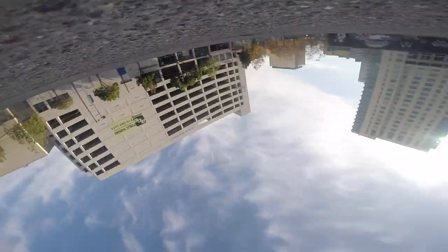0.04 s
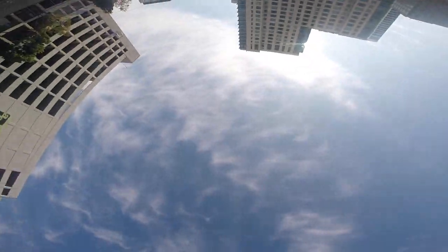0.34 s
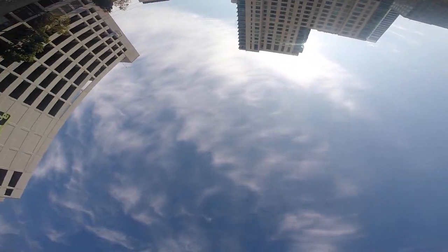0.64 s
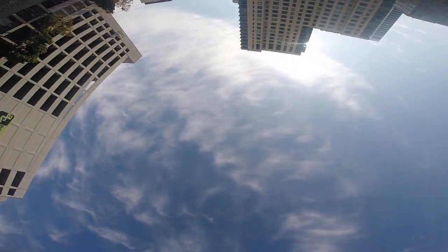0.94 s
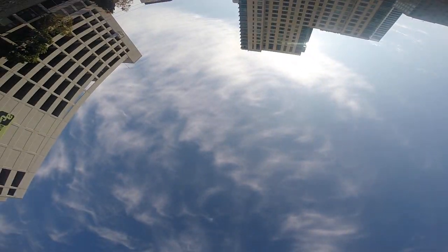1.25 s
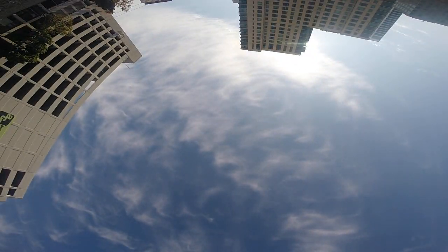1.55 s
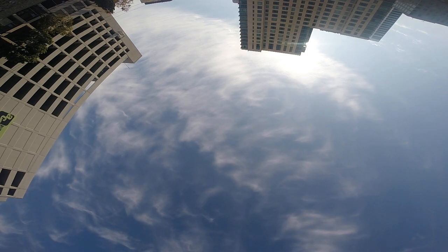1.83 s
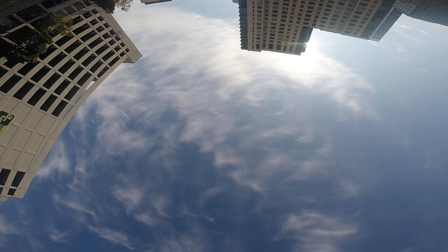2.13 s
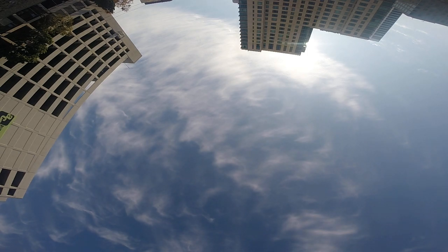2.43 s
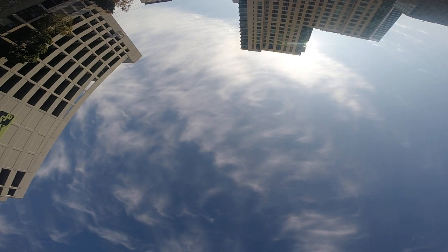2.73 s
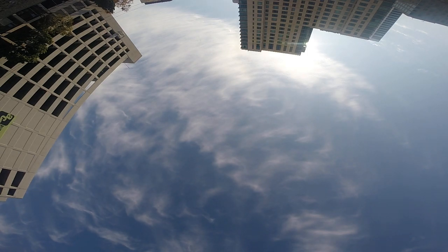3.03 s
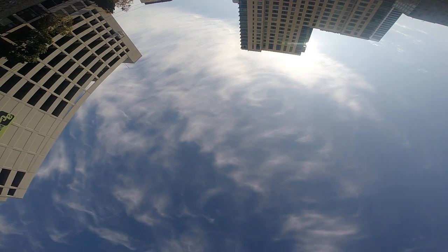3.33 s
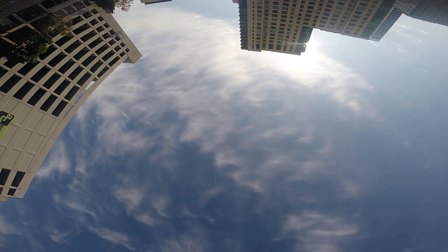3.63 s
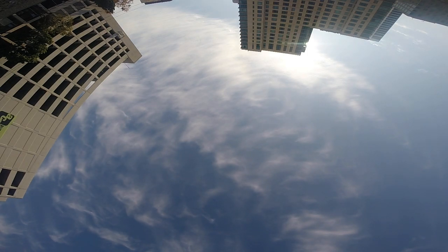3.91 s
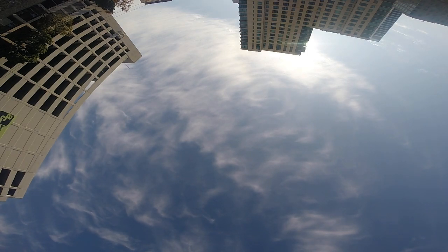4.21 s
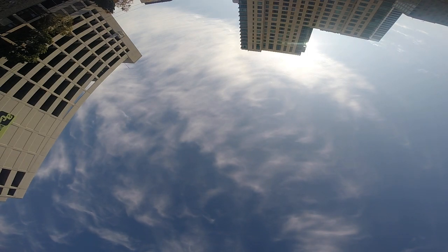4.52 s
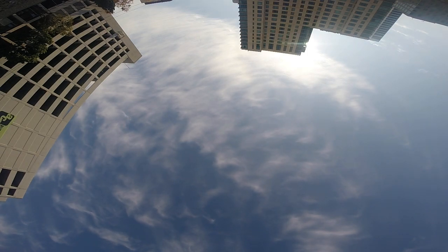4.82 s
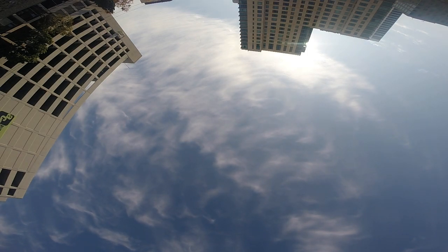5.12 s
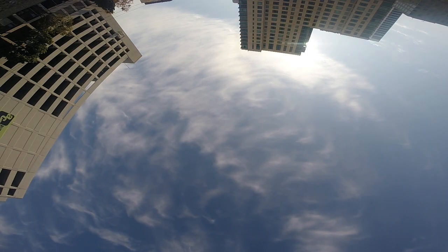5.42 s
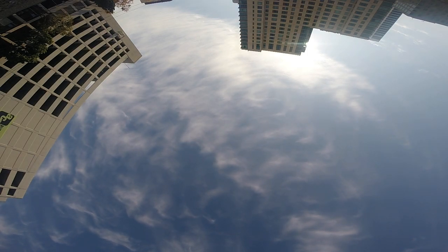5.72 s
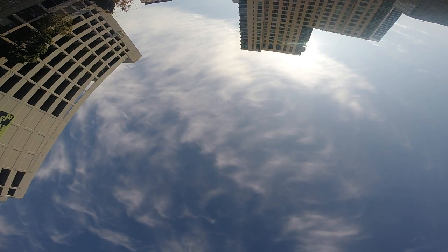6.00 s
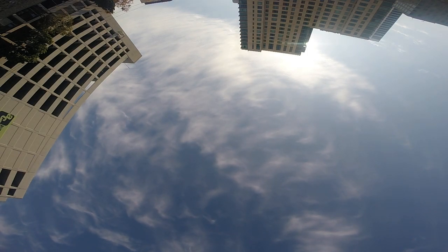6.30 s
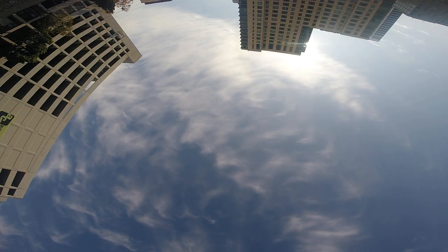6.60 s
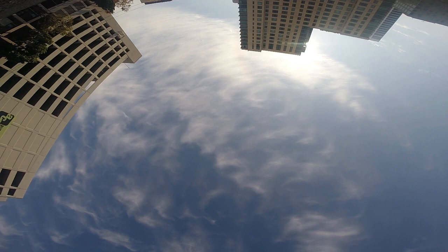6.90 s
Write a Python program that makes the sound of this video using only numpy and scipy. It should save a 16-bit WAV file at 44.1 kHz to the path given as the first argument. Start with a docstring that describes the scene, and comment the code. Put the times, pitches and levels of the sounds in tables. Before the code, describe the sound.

Loud plastic cracks and thuds burst right at the microphone as a small camera drone tumbles onto a city street. A short scrape and some propeller slaps follow, then a few sharp clicks and quick, fading bounces that end in a low tremble. The rest is quiet outdoor background: steady, faraway traffic and, late on, three barely audible squeaks in the distance.

```python
"""Drone crash on asphalt

A street between tall buildings, heard from the microphone of the camera on a small drone. Right at the
microphone the craft tumbles in hard knocks that set its frame ringing, skids, slaps the ground with its
blades, tips over with a few sharp clicks and rocks to rest, faster and faster. Then only the hush of
distant traffic is left, with a few faint squeaks far off."""
import sys
import numpy as np
from scipy import signal
from scipy.fft import rfft, irfft
from scipy.io import wavfile

SR = 44100
rng = np.random.default_rng(int(sys.argv[2]) if len(sys.argv) > 2 else 0)


def dump(signal):
    """Clip the signal to [-1, 1] and save it as 16-bit WAV at the path in sys.argv[1]."""
    limited = np.clip(np.atleast_2d(signal).T, -1, 1)
    pcm = np.round(limited * 32767).astype(np.int16)
    wavfile.write(sys.argv[1], SR, pcm)


N = 306495
TIME = np.arange(N) / SR

# long modes of arms and propellers: (frequency [Hz], level [dB], t60 [s])
FRAME_MODES = [(278.3, -13.5, 0.14), (552, -39.5, .2), (838.5, -33, 0.12), (1110, -39, .18),
               (1400, -36.5, .18), (1655, -36, .17), (1810, -33.5, .14), (1935, -31.5, 0.18),
               (1939.5, -31, 0.17), (2173, -35.5, 0.14), (2284, -32.5, .16), (2550, -31, .22),
               (2760, -34.5, 0.28), (2883, -34, 0.24), (3728, -48, .13), (5500, -46.5, .12),
               (5700, -45, 0.083), (9512, -50.5, .09), (9800, -49, 0.098)]
# wash of the frame's dense small modes: (frequency [Hz], level [dB])
RATTLE_SPECTRUM = [(150, -12.5), (300, -1), (500, -5.5), (1100, -7), (2000, -0.5), (2900, 5.5), (3500, -17),
                   (4500, -30), (16000, -70.5)]
# brittle, short-lived modes of the case: (frequency [Hz], level [dB])
BRITTLE_SPECTRUM = [(1000, -13), (3000, -1), (4300, -4), (5800, -0.5), (7200, -12), (8600, -16),
                    (9900, -8.5), (11000, -25), (14000, -27), (16000, -45)]
# the airframe hits the asphalt, each spot with a clack of its own:
# (time [s], thump level [dB], thump pitch [Hz], crack level [dB], clack pitch [Hz], brightness [Hz])
AIRFRAME_HITS = [(.0344, -2, 138, -8.5, 660, 9200), (.1005, -5, 272, -5.5, 1000, 6500),
                 (0.1093, -6, 182, 1.5, 2350, 4500), (0.1546, -4.5, 155, -4, 1780, 6700),
                 (0.1873, -6.5, 155, -15, 2010, 6900), (0.2076, -5, 214, 7, 1280, 2900),
                 (.2260, -9.5, 128, -11, 2600, 5000), (0.2457, -14, 149.4, -27, 2670, 6000),
                 (0.2695, -14, 167, -6.5, 1440, 3600), (0.2863, -13.5, 121, -26, 2500, 4000),
                 (0.3837, -29, 130, -34.5, 2800, 3000), (0.4047, -13, 136, -30, 2300, 5000),
                 (.4224, -21.5, 220, -37, 1500, 6000), (.4380, -15.5, 267, -25, 880, 2500),
                 (0.5302, -45.5, 62, -55.5, 2810, 6000), (.6340, -46.5, 55, -50, 1715, 6000),
                 (0.7384, -25.5, 100, -29.5, 1000, 2000), (.7538, -10.5, 130, -26, 800, 2000)]
# quickly damped plastic shell: (frequency [Hz], level [dB], t60 [s])
SHELL_MODES = [(360, -11.5, 0.021), (529, -19, .012), (783, -8.5, 0.014), (1350, -5, .014),
               (1620, -5.5, .014), (2024, -2.5, 0.0089), (2549, -5.5, .014), (2990, -12.5, 0.014),
               (5710, -20.5, 0.0072), (9797, -31, 0.009)]
# grit crushed under a contact: (frequency [Hz], level [dB])
GRIT_SPECTRUM = [(200, -4), (1000, -0.5), (2700, -1), (4300, -4.5), (6200, -4.5), (7500, -9),
                 (10000, -14.5), (13500, -12.5), (16000, -26.5)]
# a metal motor bell sings on: (frequency [Hz], level [dB], t60 [s])
MOTOR_BELL_MODES = [(1820, -45.5, 0.94)]
# the shell slides: (start [s], length [s], level [dB])
SHELL_SLIDES = [(0.224, 0.08, -32.5), (0.415, 0.033, -42)]
# a propeller blade slaps the ground: (time [s], level [dB])
BLADE_HITS = [(.276, -16), (.307, -16.5), (.390, -22.5), (.415, -26), (.4271, -20.5), (0.4457, -23),
              (.762, -20.5)]
# the craft flexes on its legs once it is down: (frequency [Hz], level [dB], t60 [s])
LEG_MODES = [(155.8, -25.5, 0.26), (235.6, -24.5, 0.14), (423, -35, 0.08), (660, -39.5, .06)]
# the camera case taps the asphalt: (time [s], level [dB])
CASE_TAPS = [(.6619, -19), (.6750, -15), (.6850, -6.5), (0.7446, -25.5)]
# the camera case, right at the microphone: (frequency [Hz], level [dB], t60 [s])
CASE_MODES = [(110, -25.5, .12), (252, -17.5, 0.03), (430, -24, .025), (1117, -15.5, 0.0049),
              (1420, -5.5, 0.015), (2200, -29, 0.011), (2756, -8.5, 0.024), (3630, -7.5, .014),
              (5290, 0, 0.0098), (5895, -2, .012), (6230, -4, 0.013), (8300, -15, .006),
              (12600, -21, 0.0089)]
# distant traffic: (frequency [Hz], level [dB])
TRAFFIC_SPECTRUM = [(12, -28), (20, -1.5), (54, -0.5), (80, 0), (119, -2.5), (238, -5.5), (393, -9.5),
                    (614, -12), (932, -14.5), (1580, -16.5), (1870, -18.5), (6020, -28), (11400, -37.5),
                    (13900, -38.5), (15500, -44)]
# far-off squeaks: (time [s], level [dB], pitch [Hz], width [Hz], relative overtone level [dB])
DISTANT_SQUEAKS = [(5.325, -61.5, 1617, 59.8, -21.5), (5.535, -62.5, 1450, 180, -6),
                   (5.72, -66, 1530, 260, -5)]

GROUNDED_S = 0.307   # from here on the frame lies on the asphalt


def from_db(db):
    """Decibels to amplitude."""
    return 10 ** (np.asarray(db) / 20)


def rms_one(x):
    """Scale to unit rms."""
    return x / np.sqrt(np.mean(x ** 2) + 1e-20)


def peak_one(x):
    """Scale to unit peak."""
    return x / np.abs(x).max()


def add(out, s, sound):
    """Mix a sound in from time s."""
    at = max(round(s * SR), 0)
    out[at:at + len(sound)] += sound[:N - at]


def low_pass(x, hz, order=2):
    """Butterworth low-pass."""
    return signal.sosfilt(signal.butter(order, hz, fs=SR, output="sos"), x)


def resonance(x, hz, width_hz):
    """Two-pole band-pass with gain 1 at its peak."""
    r = np.exp(-np.pi * width_hz / SR)
    feedforward = np.array([1, 0, -1]) * (1 - r * r) / 2
    feedback = [1, -2 * r * np.cos(2 * np.pi * hz / SR), r * r]
    return signal.lfilter(feedforward, feedback, x + 1e-18)


def noise(spectrum, size):
    """Noise with the given spectrum, rms 1."""
    hz, db = np.transpose(spectrum)
    bins = np.maximum(np.fft.rfftfreq(size, 1 / SR), 1)
    gain = from_db(np.interp(np.log(bins), np.log(hz), db))
    return rms_one(irfft(rfft(rng.standard_normal(size)) * gain, size))


def struck(modes, t, spread_db, lead_s=0):
    """Decaying modes, new in strength at every blow; lead_s keeps them in step with earlier ringing."""
    offsets_db = rng.normal(0, spread_db, len(modes))
    out = np.zeros(len(t))
    for k, (hz, db, t60) in enumerate(modes):
        decay = from_db(db + offsets_db[k] - 60 * t / t60)
        out += (-1) ** k * decay * np.sin(2 * np.pi * hz * (t + lead_s))
    return out


def frame_ring(s, bright_hz, rattle_t60=0.17, brittle_t60=0.075, ground_db_per_s=260):
    """Arms, propellers and small modes ring after a blow at time s, until the ground damps them."""
    t = TIME[:SR // 2]
    rattle = noise(RATTLE_SPECTRUM, len(t)) * from_db(-22 - 60 * t / rattle_t60)
    brittle = low_pass(noise(BRITTLE_SPECTRUM, len(t)), bright_hz) * from_db(-25 - 60 * t / brittle_t60)
    arms = struck(FRAME_MODES, t, spread_db=2.5, lead_s=s)
    lying_s = np.clip(s + t - GROUNDED_S, 0, t)
    return (arms + rattle + brittle) * from_db(-ground_db_per_s * lying_s)


def thump(hz):
    """Camera and microphone are shoved on their mount and swing back; the whole craft sways along."""
    push = low_pass(signal.unit_impulse(SR // 5), 1.4 * hz)
    mount = resonance(push, hz, width_hz=1.05 * hz)
    sway = from_db(-7) * resonance(push, hz=42, width_hz=70)
    return -peak_one(mount + sway)


def crack(modes, grit, grit_t60):
    """A hard contact: short modes plus the crunch of grit under them."""
    t = TIME[:SR // 10]
    crunch = noise(GRIT_SPECTRUM, len(t)) * from_db(-60 * t / grit_t60)
    return peak_one(struck(modes, t, spread_db=1.5)) + grit * crunch


def knock(thump_db, thump_hz, crack_db, clack_hz, bright_hz, clack_db=-1, clack_t60=0.016):
    """One contact of the shell: a thump through the mount and a crack coloured by the spot hit."""
    out = from_db(thump_db) * thump(thump_hz)
    contact = crack(SHELL_MODES + [(clack_hz, clack_db, clack_t60)], grit=0.21, grit_t60=0.019)
    add(out, 0, from_db(crack_db) * peak_one(low_pass(contact, bright_hz)))
    return out


def tumble(airborne_ring_db=-3.5, grounded_ring_db=-25, ring_limit_db=-10):
    """Each blow thumps, cracks and rings close to the microphone; the frame rings from the start."""
    out = np.zeros(N)
    add(out, 0, from_db(-7) * frame_ring(0, bright_hz=7000)[SR // 20:])
    for s, thump_db, thump_hz, crack_db, clack_hz, bright_hz in AIRFRAME_HITS:
        add(out, s, knock(thump_db, thump_hz, crack_db, clack_hz, bright_hz))
        if s < GROUNDED_S:   # blows before the frame lies on the ground set the motor bell ringing
            ring_db = min(thump_db + airborne_ring_db, ring_limit_db)
            add(out, s, from_db(ring_db) * struck(MOTOR_BELL_MODES, TIME[:SR], spread_db=0.97, lead_s=s))
        else:
            ring_db = thump_db + grounded_ring_db
            add(out, s, from_db(thump_db) * struck(LEG_MODES, TIME[:SR], spread_db=0.5))
        add(out, s, from_db(ring_db) * frame_ring(s, bright_hz))
    return out


def skid(grains_per_s=1400, bright_hz=3150, attack_s=0.02, release_db_per_s=620):
    """Grains of asphalt catch on the sliding shell, and a dragging edge rasps."""
    sizes_db = 4 * np.minimum(rng.exponential(1, N), 4)
    grains = from_db(sizes_db) * rng.choice([-1, 1], N)
    catches = grains * (rng.random(N) < grains_per_s / SR)
    shell = rms_one(signal.fftconvolve(catches, crack(SHELL_MODES, grit=0.073, grit_t60=0.014))[:N])
    rasp = from_db(-1) * rms_one(resonance(catches, hz=2850, width_hz=450))
    pressure = np.zeros(N)
    for s, length_s, db in SHELL_SLIDES:
        attack = np.clip((TIME - s) / attack_s, 0, 1)
        pressure += attack * from_db(db - release_db_per_s * np.maximum(TIME - s - length_s, 0))
    return pressure * rms_one(low_pass(shell + rasp, bright_hz, order=4))


def blade_slaps(thump_hz=190, clack_hz=2823, bright_hz=3070):
    """A light blade clacks at its own pitch and shakes the frame, but hardly moves the camera."""
    out = np.zeros(N)
    for s, db in BLADE_HITS:
        add(out, s, knock(db - 9, thump_hz, db, clack_hz, bright_hz, clack_db=1.5, clack_t60=0.021))
        add(out, s, from_db(db - 9) * frame_ring(s, bright_hz))
    return out


def case_clicks(chatter_from_s=0.704, chatter_gap_s=0.0099, chatter_db=-37.5, chatter_count=6):
    """As the craft tips over, the camera case taps and chatters unevenly, barely stirring the frame."""
    out = np.zeros(N)
    chatter = [(chatter_from_s + chatter_gap_s * (k + 0.2 * late), chatter_db + 2.5 * loud)
               for k, (late, loud) in enumerate(rng.standard_normal((chatter_count, 2)))]
    for s, db in CASE_TAPS + chatter:
        add(out, s, from_db(db) * crack(CASE_MODES, grit=0.24, grit_t60=0.013))
        add(out, s, from_db(db - 20) * frame_ring(s, bright_hz=5980))
    return out


def bounces(from_s=0.8128, count=5, first_gap_s=0.0368, shortest_gap_s=0.0178, gap_shrink=0.44):
    """The craft bounces from leg to leg, ever sooner and softer; the crack fades before the thump."""
    out, s = np.zeros(N), from_s
    for k in range(count):
        db = -17 - 3.5 * k
        add(out, s, knock(db, thump_hz=118 - 4.2 * k, crack_db=-37 - 8 * k, clack_hz=500, bright_hz=2600))
        add(out, s, from_db(db) * struck(LEG_MODES, TIME[:SR], spread_db=5))
        s += shortest_gap_s + (first_gap_s - shortest_gap_s) * gap_shrink ** k
    return out


def wobble(from_s=0.9225, rock_t60=0.37, tremble_t60=2.4, rest_hz=71.5, sag_hz=12.5):
    """The bounces close up into rocking: wide swings are slow and lopsided, small ones quick and pure."""
    age = np.maximum(TIME - from_s, 0)
    rocking = from_db(-32 - 60 * age / rock_t60)
    tremble = from_db(-50 - 60 * age / tremble_t60)   # the smallest swings are hardly damped
    swing = rocking + tremble
    rate_hz = rest_hz - sag_hz * peak_one(swing)
    phase = 2 * np.pi * np.cumsum(rate_hz * (age > 0)) / SR
    lopsided = from_db(-11) * np.sqrt(peak_one(swing))
    return swing * (np.sin(phase) + lopsided * np.sin(2 * phase) + lopsided ** 2 * np.sin(3 * phase))


def distant_traffic(steady_db=-56.5, gain_recovery_db_per_s=16, recovered_s=1.453):
    """The steady hush of far traffic, faint during the crash, comes up as the recorder's gain recovers."""
    level_db = steady_db - gain_recovery_db_per_s * np.maximum(recovered_s - TIME, 0)
    return from_db(level_db) * noise(TRAFFIC_SPECTRUM, N)


def distant_squeaks(rise_s=0.015):
    """Faint squeaks far from the microphone, blurred by the buildings into narrow bands of noise."""
    out = np.zeros(N)
    t = TIME[:SR // 2]
    envelope = t / rise_s * np.exp(1 - t / rise_s)
    for s, db, hz, width_hz, overtone_db in DISTANT_SQUEAKS:
        tone = rms_one(resonance(rng.standard_normal(len(t)), hz, width_hz))
        overtone = rms_one(resonance(rng.standard_normal(len(t)), 2 * hz, 2 * width_hz))
        add(out, s, from_db(db) * (tone + from_db(overtone_db) * overtone) * envelope)
    return out


def scene():
    """The crash up close and the city far behind it, in mono."""
    crash = tumble() + blade_slaps() + case_clicks() + skid() + bounces() + wobble()
    return (crash + distant_traffic() + distant_squeaks())[None]


def record(dry):
    """The hardest blow overloads the camera's microphone; the treble is cut above 15.2 kHz."""
    clipped = dry / (1 + dry ** 8) ** (1 / 8)
    treble_cut = signal.ellip(10, 0.1, 80, 15200, fs=SR, output="sos")
    return signal.sosfilt(treble_cut, clipped)


dry = scene()
out = record(dry)
dump(out)
```